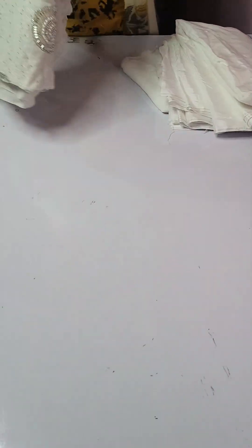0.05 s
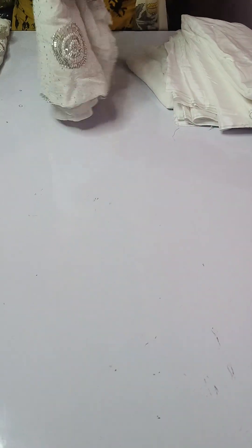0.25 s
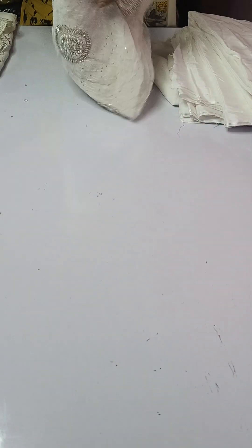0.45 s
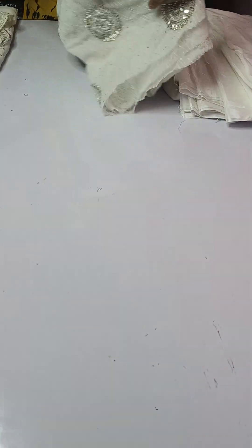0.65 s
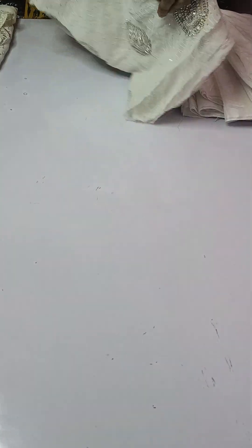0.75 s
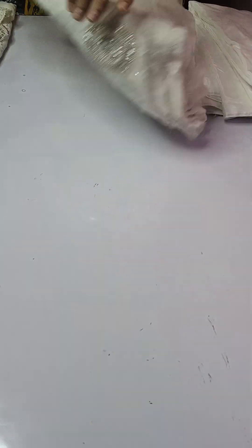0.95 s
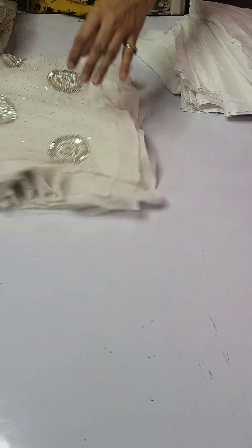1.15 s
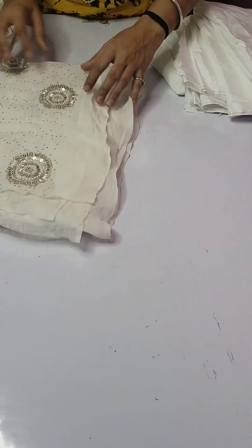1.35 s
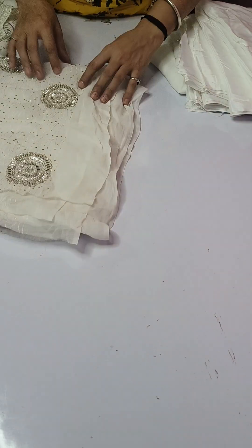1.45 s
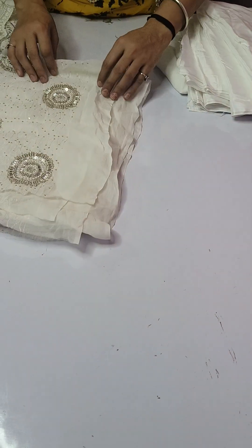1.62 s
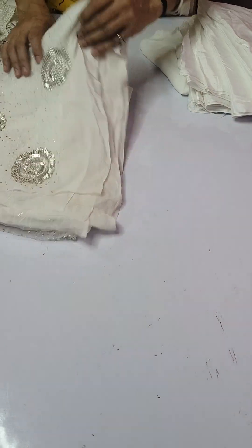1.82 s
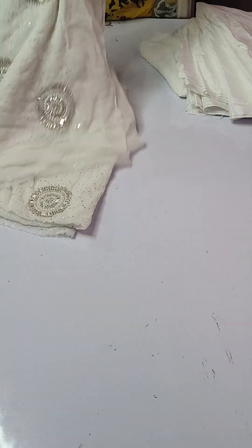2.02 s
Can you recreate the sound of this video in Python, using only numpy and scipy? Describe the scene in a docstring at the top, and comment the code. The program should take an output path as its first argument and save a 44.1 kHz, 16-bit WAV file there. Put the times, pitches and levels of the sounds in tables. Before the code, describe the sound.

Light fabric swishes once as it is flapped open onto a table, with faint jewellery clinks.

```python
"""A small, hard-walled shop, where a light cloth with beaded motifs is lifted, flicked open and dropped.
Its fibres rustle as the layers slide, then it whips taut and lands on a table with a puff of air
and a patter of beads. The hem knocks a hollow ring out of the table top, and a bangle clinks.
The room rings briefly over a steady ventilation hum."""
import sys
import numpy as np
from scipy import signal
from scipy.fft import rfft, irfft
from scipy.io import wavfile

SR = 44100
rng = np.random.default_rng(int(sys.argv[2]) if len(sys.argv) > 2 else 0)


def to_wav(sig):
    """Store sig (one row per channel, or 1-D mono) as 16-bit WAV at the path in sys.argv[1].

    Samples outside -1..1 are clipped; the rate is SR.
    """
    pcm = np.clip(np.atleast_2d(sig), -1, 1) * 32767
    pcm = np.round(pcm).astype(np.int16)
    wavfile.write(sys.argv[1], SR, pcm.T)  # frames by channels


N = 91639

# what rings when the beaded cloth hits the table: (pitch [Hz], relative level [dB], t60 [s])
TABLE_RESONANCES = [(893, -0.5, 0.087), (910, -3, 0.082), (1077, -1, 0.18), (1195, -3, 0.28),
                    (1462, -6, 0.088), (1695, -4.5, 0.1), (1894, -10, .12), (2125, -6, 0.13),
                    (2533, -4, .08), (2903, -3.5, .05), (2987, -3.5, 0.11)]


def undb(db):
    """Decibels to gain."""
    return 10 ** (np.asarray(db) / 20)


def unit(x):
    """Scale to rms 1."""
    return x / np.sqrt(np.mean(x ** 2))


def burst(x):
    """Give a short sound the energy of 10 ms at rms 1."""
    return x / np.sqrt(np.sum(x ** 2) / (SR / 100))


def times():
    """The time of every sample."""
    return np.arange(N) / SR


def freqs():
    """The frequency of every spectral bin."""
    return np.arange(N // 2 + 1) * SR / N


def along(points, hz):
    """Read (Hz, value) points on a log-frequency axis."""
    f, v = np.array(points).T
    return np.interp(np.log(np.maximum(hz, 1)), np.log(f), v)


def colour(x, eq):
    """Equalise by (frequency [Hz], gain [dB]) points."""
    return irfft(rfft(x) * undb(along(eq, freqs())), N)


def resonate(x, hz, width):
    """One resonance, gain 1 at its centre; width is a share of the pitch."""
    return signal.lfilter(*signal.iirpeak(hz, 1 / width, fs=SR), x)


def wander(rate_hz):
    """Smooth random drift with rms 1."""
    return unit(irfft(rfft(rng.standard_normal(N)) * np.exp(-(freqs() / rate_hz) ** 2), N))


def swell(peak, rise, fall):
    """An envelope that grows to its peak and dies away."""
    t = times() - peak
    return np.exp(-np.where(t < 0, (t / (2 * rise)) ** 2, t / fall))


def ring(modes, start=0, contact_s=0.0009):
    """Struck modes build during the contact and decay; each level sets a mode's energy."""
    t = np.maximum(times() - start, 0)
    tones = sum(undb(db) / np.sqrt(t60) * np.sin(2 * np.pi * hz * t) * np.exp(-np.log(1000) * t / t60)
                for hz, db, t60 in modes)
    return (1 - np.exp(-t / contact_s)) * tones


def crack(start, decay_s):
    """A snap of noise that dies at once."""
    t = times() - start
    return rng.standard_normal(N) * (t >= 0) * np.exp(-np.abs(t) / decay_s)


def snags(per_s=12000, spread_db=3.5):
    """Tiny catches of threads or beads, a few much bigger than the rest."""
    hit = rng.random(N) < per_s / SR
    return hit * rng.choice([-1, 1], N) * undb(spread_db * np.minimum(rng.exponential(size=N), 6))


def sheet_noise(eq, shared_below_hz=664):
    """Fibre noise from a broad sheet: shared by both ears in the bass, unrelated in the treble."""
    shared = 1 / (1 + (freqs() / shared_below_hz) ** 4)
    centre = rfft(snags()) * np.sqrt(shared)
    ears = [irfft(centre + rfft(snags()) * np.sqrt(1 - shared), N) for _ in range(2)]
    return np.array([unit(colour(ear, eq)) for ear in ears])


def room(x, wet_db, build_s=0.0013):
    """Direct sound plus a diffuse tail, different at each ear and shorter in the treble."""
    # reverb time of the shop: (frequency [Hz], t60 [s])
    decay = [(100, 0.39), (800, 0.45), (2000, 0.37), (4300, 0.34), (8000, 0.22), (16000, 0.22)]
    t, f = times(), freqs()
    noise = rfft(rng.standard_normal((2, N)))
    edges = np.concatenate([[0], np.geomspace(200, SR / 2, 8)])
    tail = 0
    for lo, hi in zip(edges, edges[1:]):
        band = irfft(noise * ((f >= lo) & (f < hi)), N)
        tail += band * np.exp(-np.log(1000) * t / along(decay, (lo + hi) / 2))
    tail *= 1 - np.exp(-t / build_s)
    tail /= np.sqrt(np.sum(tail ** 2, axis=1, keepdims=True))
    return x + undb(wet_db) * signal.fftconvolve(np.atleast_2d(x), tail, axes=1)[:, :N]


def early_reflections(x):
    """Close reflections ripple the spectrum and leave the loudness alone."""
    # bounces off the table top and nearby things: (delay [s], level [dB])
    bounces = [(.00135, -26.5), (.0032, -13.5)]
    comb = 1 + sum(undb(db) * np.exp(-2j * np.pi * freqs() * delay) for delay, db in bounces)
    return irfft(rfft(x) * comb / np.sqrt(np.mean(np.abs(comb) ** 2)), N)


def ventilation(waver=0.41, drift_hz=2.96):
    """A bed of low rumble, wavering hum tones and a midrange wash that slowly grows."""
    # tone of the moving air: (frequency [Hz], gain [dB])
    air_eq = [(25, -13.5), (45, -12.5), (70, -12.5), (105, 0.5), (140, -15.5), (185, -9.5), (230, -14),
              (400, -14), (540, -27), (800, -27.5), (1100, -31), (1400, -40), (2700, -45), (4000, -53.5),
              (6000, -59), (11000, -60.5), (13000, -53.5), (14200, -55.5), (16000, -56.5)]
    # its stereo width: (frequency [Hz], side against mid [dB])
    air_width = [(30, -11), (90, -9), (180, -14), (350, -9), (700, -5), (1500, 1.5), (16000, 0)]
    # hum tones: (pitch [Hz], level [dB])
    hum_tones = [(72, -63), (100, -59), (184, -65.5)]
    # slow rise of the wash: (time [s], level [dB])
    wash_fade = [(0, -69.5), (.6, -67), (1.05, -66), (1.55, -64.5), (2.08, -62)]
    # tone of the wash: (frequency [Hz], gain [dB])
    wash_eq = [(500, -3.5), (800, -10), (1100, 6), (1700, -2.5), (2100, -12.5), (3000, -13.5), (5000, -60)]
    mid, side = (unit(colour(rng.standard_normal(N), air_eq)) for _ in range(2))
    rumble = undb(-56) * (mid + colour(side, air_width) * np.array([[1], [-1]]))
    hum = 0
    for hz, db in hum_tones:
        level = undb(db) * np.sqrt(2) * (1 + waver * wander(13))
        pitch = hz + drift_hz * wander(10.5)
        hum += level * np.sin(2 * np.pi * np.cumsum(pitch) / SR)
    wash_level = undb(np.interp(times(), *np.array(wash_fade).T))
    wash = wash_level * unit(colour(rng.standard_normal((2, N)), wash_eq))
    return rumble + hum + wash


def beads():
    """Lone beads tick against each other and the table."""
    # bead ticks: (time [s], level [dB], pitch [Hz])
    ticks = [(0.483, -76, 4570), (0.5927, -64.5, 12500), (.861, -74, 13700), (1.143, -41, 15300),
             (1.1484, -39, 13000), (1.214, -41, 12800), (1.227, -44.5, 8500), (1.3173, -51, 14800),
             (1.3294, -57, 14800), (2.018, -79, 14300)]
    out = 0
    for at, db, hz in ticks:
        tick = crack(at, decay_s=0.002)
        for _ in range(2):
            tick = resonate(tick, hz, width=0.32)
        out += undb(db) * burst(tick)
    return out


def bangle():
    """Each clink is a bright click and a short, hand-damped ring whose pitch depends on where it is hit."""
    # strikes: (time [s], level [dB], click against ring [dB], main pitch [Hz])
    clinks = [(0.5468, -56.5, 2.5, 2955), (0.5522, -55.5, -2, 3025), (0.788, -75, -3, 2930),
              (0.81, -76.5, -19, 2910), (0.914, -77, -12, 3000), (1.083, -60, 1.5, 3043),
              (1.089, -56, 0.5, 2960), (1.094, -47, -16, 3037), (1.149, -38, -10.5, 2930),
              (1.175, -40, -9, 3107), (1.247, -43.5, -9, 2904)]
    # modes of the hoop: (pitch over main pitch [ratio], relative level [dB], t60 [s])
    modes = [(0.505, -14.5, 0.1), (.745, -17, 0.057), (1, -1, 0.034), (1.07, -7, .018), (1.283, -17, 0.069),
             (1.76, -15.5, 0.042), (2.28, -13, 0.03)]
    # tone of the click: (frequency [Hz], gain [dB])
    click_eq = [(800, -4.5), (2500, 0), (5000, -4), (8000, 3), (15000, -6)]
    out = 0
    for at, db, click_db, hz in clinks:
        tone = ring([(hz * ratio, mode_db, t60) for ratio, mode_db, t60 in modes], at)
        click = colour(crack(at, decay_s=0.003), click_eq)
        out += undb(db) * (burst(tone) + undb(click_db) * burst(click))
    return out


def puffs(roughness=0.84):
    """Air squeezed from under the cloth and the hand's pat: a few rough, low swings each."""
    # soft thumps: (peak time [s], level [dB], rise [s], fall [s], pitch [Hz])
    thumps = [(1.199, -37, 0.014, 0.024, 127.3), (1.239, -43.5, 0.0069, 0.087, 83.1),
              (1.42, -50, .012, 0.021, 91.3)]
    breath_eq = [(25, -6), (90, 12.5), (200, 3.0), (400, -16), (900, -41.5), (3000, -79)]
    out = 0
    for at, db, rise, fall, hz in thumps:
        swing = np.sqrt(2) * np.sin(2 * np.pi * hz * (times() - at))
        breath = unit(colour(rng.standard_normal(N), breath_eq))
        out += undb(db) * swell(at, rise, fall) * (swing + roughness * breath)
    return out


def hem_knocks():
    """The heavy, beaded hem strikes the table top, which rings hollow."""
    # knocks: (time [s], level [dB])
    hits = [(0.485, -71), (1.1352, -37.5), (1.175, -39.5), (1.184, -40)]
    return sum(undb(db) * burst(ring(TABLE_RESONANCES, at)) for at, db in hits)


def rustle():
    """Layers of cloth slide with a soft hiss, while the beads jingle at a new pitch on each move."""
    # moves: (peak time [s], level [dB], rise [s], fall [s], jingle pitch [Hz], jingle against hiss [dB])
    moves = [(0.582, -61, .009, 0.027, 8000, -13), (.724, -78, 0.0064, 0.009, 11800, 7.5),
             (0.74, -75.5, 0.005, 0.022, 7950, 7), (0.798, -76, 0.01, 0.045, 4340, -5),
             (.87, -81.5, .02, 0.031, 7810, 3.5), (0.913, -71.5, 0.009, 0.013, 4830, 0),
             (.93, -72.5, 0.0076, 0.0079, 6420, 1.5), (1.088, -48.5, .0017, 0.04, 12300, -10),
             (1.311, -50.5, 0.026, 0.044, 12670, -11.5), (1.44, -68, 0.04, 0.0065, 8000, -8),
             (1.97, -74, 0.019, 0.034, 7100, -20), (2.06, -71.5, .04, 0.055, 7200, -11)]
    # tone of sliding fabric: (frequency [Hz], gain [dB])
    hiss_eq = [(500, -14), (1500, -7.5), (3000, 6), (4000, -3), (5500, 1), (8200, 4.5), (11000, -3.5),
               (13000, 0.5), (15800, -6)]
    hiss = sheet_noise(hiss_eq)
    jostle = np.array([snags(per_s=540, spread_db=4.5) for _ in range(2)])
    out = 0
    for at, db, rise, fall, hz, jingle_db in moves:
        jingle = unit(resonate(jostle, hz, width=0.026))
        out += undb(db) * swell(at, rise, fall) * (hiss + undb(jingle_db) * jingle)
    return out


def cloth(table_db=-15.5):
    """The cloth whips taut and lands, setting the table ringing, with quiet rustles before and after."""
    # strokes: (peak time [s], level [dB], rise [s], fall [s], blend from whip to landing [0-1])
    strokes = [(1.142, -26.5, 0.0053, 0.004, .1), (1.199, -29, 0.018, 0.022, 0.96),
               (1.225, -38, 0.0066, 0.036, 1)]
    # bright tone of the whip: (frequency [Hz], gain [dB])
    whip_eq = [(200, -17.5), (600, -16.5), (900, -7), (1250, -8.5), (2300, 11.5), (4000, 5), (5500, 5.5),
               (8200, 6.5), (11000, -17.5), (13000, 2.5), (15800, 6.5)]
    # fuller tone of the landing: (frequency [Hz], gain [dB])
    landing_eq = [(150, -3), (300, -4.5), (450, -5.5), (730, -7), (900, -2), (1500, 4), (2200, -1),
                  (3000, 1.5), (4500, -2.5), (6500, -6.5), (8200, -3), (11000, -6), (13000, 0),
                  (15800, -10)]
    flap = pressure = 0
    for at, db, rise, fall, blend in strokes:
        envelope = undb(db) * swell(at, rise, fall)
        whip = np.sqrt(1 - blend) * sheet_noise(whip_eq)
        landing = np.sqrt(blend) * sheet_noise(landing_eq)
        flap += envelope * (whip + landing)
        pressure += envelope
    force = pressure * unit(snags())
    response = ring(TABLE_RESONANCES)
    response /= np.sqrt(np.sum(response ** 2))
    table = undb(table_db) * signal.fftconvolve(force, response)[:N]
    return early_reflections(flap + rustle()) + table


def scene():
    """Cloth and jewellery close by, in the humming shop."""
    # stereo lean of the close sounds: (frequency [Hz], left minus right [dB])
    balance = [(100, 0), (380, -6), (700, 2), (1300, 1.5), (2400, -2.5), (4400, -5.5), (8100, 4.5),
               (15000, -4.5)]
    near = room(cloth(), wet_db=-2) + room(hem_knocks(), wet_db=-11.5)
    near += room(bangle() + beads(), wet_db=-3.5) + puffs()
    pan_db = along(balance, freqs()) * np.array([[.5], [-.5]])
    return irfft(rfft(near) * undb(pan_db), N) + ventilation()


def record(dry):
    """Master EQ: a notch in the treble and a steep cut at the top."""
    notch_hz, notch_width_hz, notch_db, top_hz = 9600, 730, -11.5, 15900
    f = np.arange(N + 1) * SR / (2 * N)
    notch = undb(notch_db * np.exp(-((f - notch_hz) / notch_width_hz) ** 2))
    high_cut = 1 / np.sqrt(1 + (f / top_hz) ** 400)
    return irfft(rfft(dry, 2 * N) * notch * high_cut)[:, :N]


dry = scene()
out = record(dry)
to_wav(out)
```